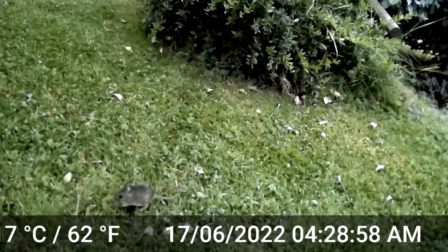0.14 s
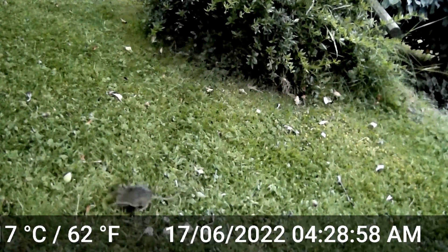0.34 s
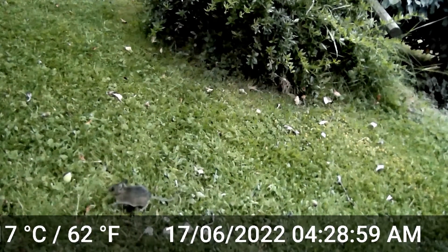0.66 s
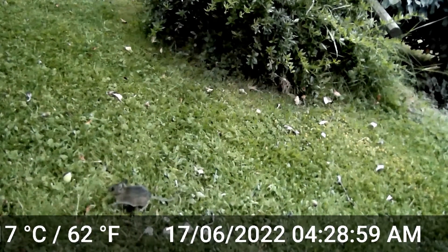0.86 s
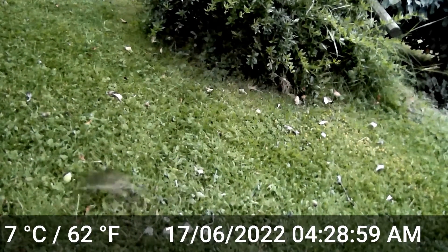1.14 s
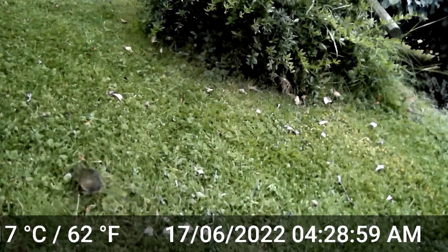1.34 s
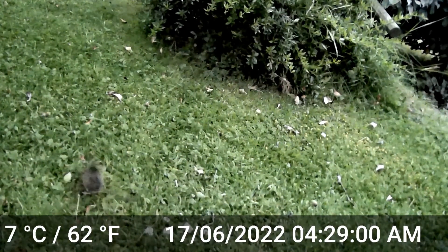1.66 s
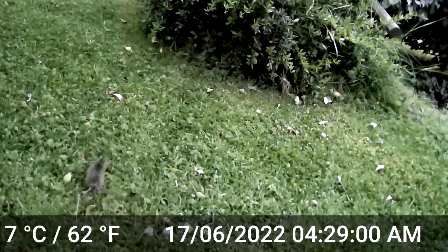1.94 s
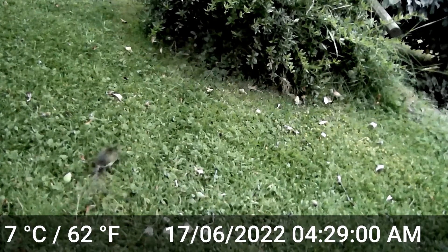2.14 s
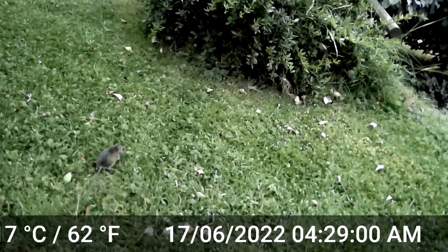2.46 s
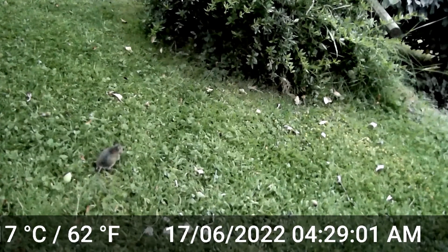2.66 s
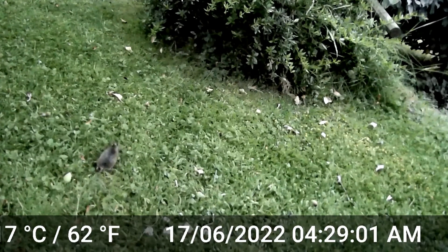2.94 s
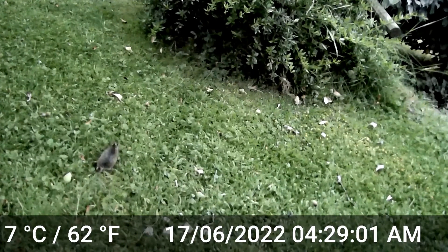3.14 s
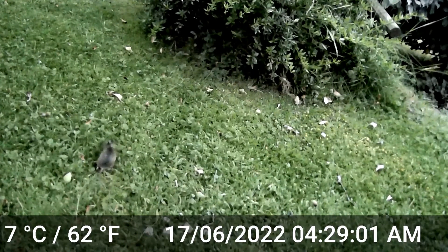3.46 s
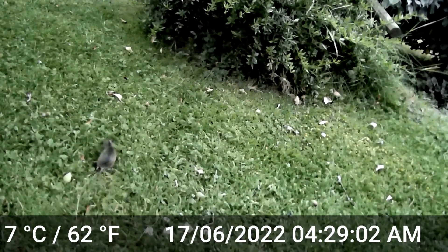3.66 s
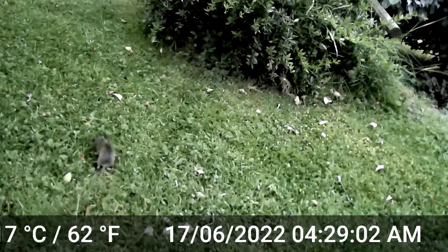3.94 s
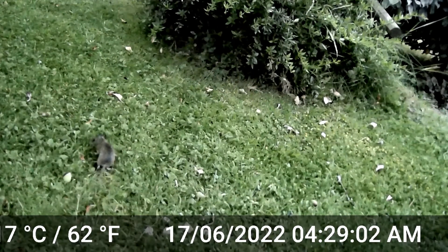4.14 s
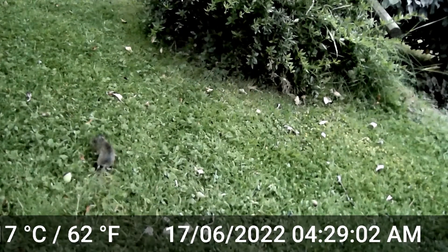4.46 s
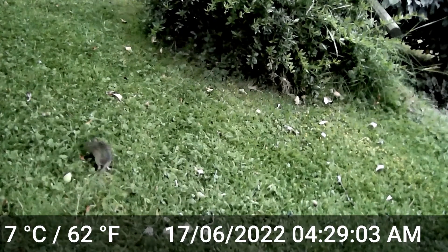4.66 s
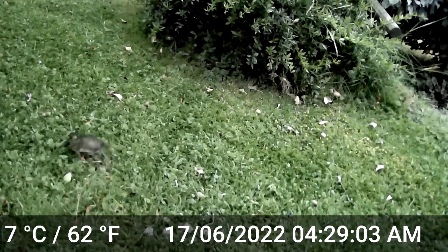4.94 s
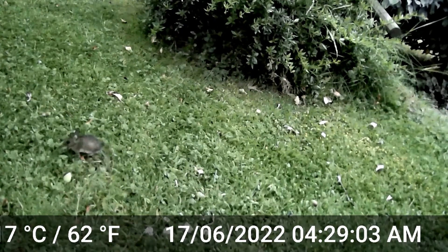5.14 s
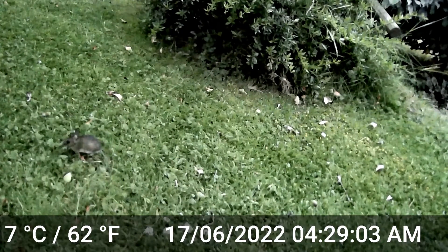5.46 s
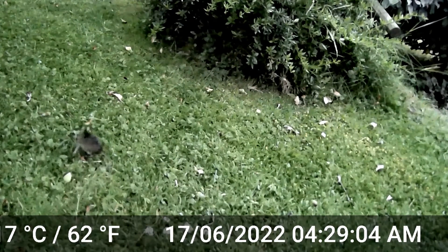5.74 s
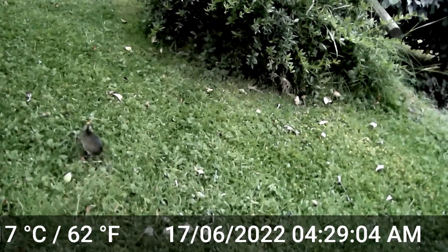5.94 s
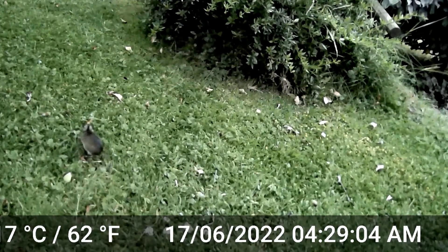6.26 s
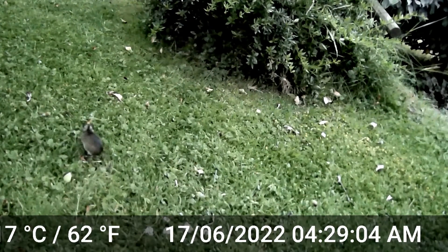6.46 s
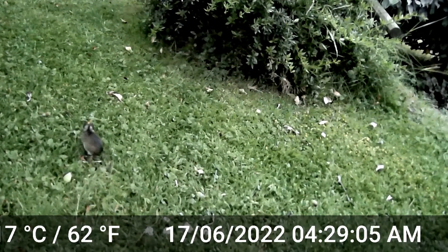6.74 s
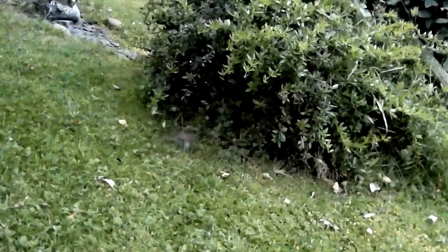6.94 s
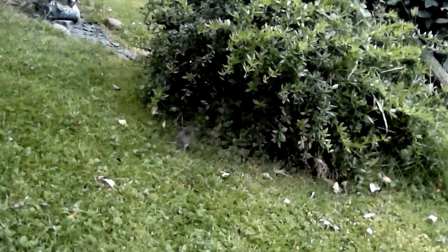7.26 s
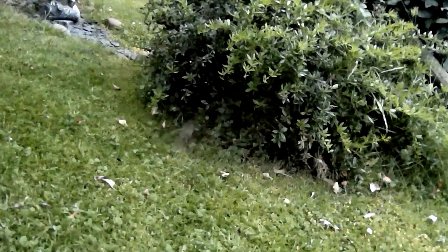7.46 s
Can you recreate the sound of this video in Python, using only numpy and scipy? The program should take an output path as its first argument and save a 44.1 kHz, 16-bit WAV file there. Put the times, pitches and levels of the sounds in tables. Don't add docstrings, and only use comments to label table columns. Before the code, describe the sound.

Outdoor dawn chorus over a lawn: a low flute-like singer, high pipers, birds repeating quick sweeps and faint distant warblers, all smeared by short echoes from fence, walls and leaves. The small camera microphone sounds band-limited and hissy, its treble briefly vanishing at times. Song is densest between two and four seconds, thins, then swells into loud whistles and trills before a dead cut with a click and barely audible rumble.

```python
import sys
import numpy as np
from scipy import signal
from scipy.io import wavfile

SR = 44100
rng = np.random.default_rng(int(sys.argv[2]) if len(sys.argv) > 2 else 0)


def persist_wave(psi):
    counts = np.round(np.clip(psi, -1, 1) * 32767).astype(np.int16)
    wavfile.write(sys.argv[1], SR, np.atleast_2d(counts).T)


def decibels_to_gain(level_db):
    exponent = np.asarray(level_db, float) / 20
    return 10 ** exponent


N = 335160

# (start [s], length [s], from [Hz], to [Hz], top level [dB])
FLUTE_NOTES = [(.13, 0.031, 1575, 1350, -59), (.175, 0.023, 1560, 1590, -59),
               (.215, .03, 1580, 1540, -66.5), (1.6, 0.034, 1400, 1510, -65.5),
               (1.625, 0.075, 1510, 1720, -55), (1.7, 0.073, 1556, 1730, -59),
               (1.75, 0.067, 1730, 1896, -58), (1.77, 0.068, 1637, 1493, -59.5),
               (1.875, 0.066, 1935, 1800, -50), (1.94, 0.098, 1860, 1795, -50),
               (1.845, 0.047, 1553, 1560, -59), (3.08, 0.069, 2273, 2270, -64.5),
               (2.96, 0.055, 1875, 1910, -63), (3.07, 0.069, 1896, 1850, -66),
               (3.335, 0.03, 1562, 1638, -52.5), (3.58, 0.064, 1813, 2030, -46.5),
               (3.65, 0.033, 2185, 2480, -55), (3.66, 0.054, 1734, 2120, -49.5),
               (3.716, 0.022, 3150, 2830, -49), (3.782, 0.031, 2390, 1875, -49.5),
               (3.87, 0.034, 2330, 1790, -59.5), (6.52, 0.044, 2310, 2320, -58)]
FAR_FLUTE_NOTES = [(.03, 0.085, 2090, 1950, -74), (.43, .17, 1697, 1660, -76), (.47, .17, 2286, 2330, -76),
                   (.72, .13, 2150, 2100, -74), (1.17, 0.052, 2250, 2370, -75),
                   (1.22, 0.08, 2350, 2274, -70), (1.31, .13, 2360, 2330, -72.5),
                   (1.47, 0.09, 2200, 2430, -71.5), (1.16, .1, 1560, 1520, -75),
                   (1.975, 0.048, 2543, 2400, -68), (2.31, 0.041, 3100, 3030, -69.5),
                   (3.44, 0.07, 2700, 2830, -66.5), (3.645, 0.026, 2960, 2950, -59),
                   (4.42, 0.055, 2213, 2220, -68.5), (4.59, 0.28, 2044, 2033, -72),
                   (4.77, 0.044, 2800, 2950, -68.5), (4.815, 0.044, 2380, 2630, -66.5),
                   (4.87, 0.098, 2460, 2520, -74), (5.04, 0.05, 2220, 2190, -68),
                   (5.27, 0.15, 2350, 2243, -74.5), (5.49, 0.096, 3150, 3260, -68.5),
                   (5.56, 0.062, 3250, 3630, -62.5), (5.62, 0.16, 3386, 2970, -63.5),
                   (5.63, .07, 1520, 1624, -65.5), (2.605, 0.023, 2990, 2810, -58.5),
                   (5.405, 0.026, 1760, 1745, -65), (2.21, .035, 2420, 2440, -71)]
PIPER_NOTES = [(.07, 0.021, 5080, 4880, -49.5), (.09, 0.049, 4780, 4590, -47.5),
               (.15, .05, 4680, 4720, -62), (.2, 0.075, 4850, 4670, -55.5), (.085, .025, 3050, 2880, -60),
               (.11, .1, 2870, 2860, -71), (.59, 0.034, 6450, 6780, -62), (.62, 0.13, 6730, 6800, -73.5),
               (1.315, 0.055, 7200, 7420, -70), (1.57, 0.032, 5700, 5270, -62),
               (1.597, 0.079, 5280, 4880, -52.5), (1.7, 0.13, 5330, 4980, -64.5),
               (2.16, .035, 7000, 5760, -68), (2.19, .03, 5700, 5650, -61.5), (2.2, .1, 5750, 5970, -66.5),
               (2.3, 0.067, 5720, 5700, -63.5), (3.745, 0.095, 6080, 6250, -67.5),
               (3.805, 0.059, 6300, 5980, -67.5), (3.86, 0.077, 6000, 6340, -70),
               (4.07, 0.038, 5060, 5060, -71), (4.11, 0.061, 5230, 5160, -66.5),
               (5.3, 0.064, 6950, 7050, -71), (5.345, 0.048, 7000, 5430, -64.5),
               (5.575, 0.026, 5320, 5150, -45.5), (5.61, 0.062, 5440, 5100, -59.5),
               (5.9, 0.018, 5400, 4370, -48.5), (5.93, 0.13, 4300, 4270, -61)]
HEDGE_NOTES = [(5.545, 0.031, 6120, 5320, -57), (5.68, 0.03, 5450, 5640, -51.5),
               (5.69, 0.022, 5580, 6050, -50), (5.9, 0.018, 5430, 4480, -53),
               (6.02, 0.049, 6250, 6670, -54.5), (6.055, 0.028, 6660, 6690, -47.5),
               (6.08, 0.09, 6640, 6730, -53), (6.13, 0.059, 6480, 6170, -55),
               (6.305, 0.032, 4690, 5160, -45.5), (6.335, 0.052, 4850, 4900, -53.5),
               (6.328, 0.021, 5050, 6150, -45.5), (6.58, 0.03, 6020, 5140, -46),
               (6.572, .018, 7000, 5900, -56), (6.6, .02, 5900, 7020, -57), (6.66, 0.095, 5170, 5160, -58),
               (6.607, 0.044, 5150, 5200, -43)]
WARBLER_PHRASES = [(1.7, 0.55, 4040, 3870, -82.5), (2.55, 0.21, 6020, 6020, -86),
                   (3.15, 0.23, 2267, 2420, -75), (4.08, 0.23, 7260, 7600, -91.5),
                   (4.78, 0.11, 3760, 3940, -74), (4.88, 0.61, 4050, 3790, -82),
                   (4.95, 0.49, 2450, 2415, -86.5), (5.45, 0.73, 2260, 2282, -82),
                   (5.65, .1, 6400, 6430, -78), (4.22, .18, 2495, 1850, -78),
                   (4.27, .14, 3650, 3300, -78.5), (5.25, .2, 2450, 2150, -79.5),
                   (4.8, .15, 2450, 2500, -83), (5.1, .2, 3900, 4130, -82)]

# (top at share of length [0-1], start below top [dB], end below top [dB])
FLUTE_SWELL = ((0.4, 6.7, 6.01))
FAR_FLUTE_SWELL = ((.5, 3.8, 5.4))
PIPER_SWELL = ((0.14, 5.4, 8.5))
HEDGE_SWELL = ((0.44, 8.2, 3.7))
WARBLER_SWELL = ((0.36, 2, 3.6))

# (time [s], pitch [Hz], level [dB])
HELD_LOW = [
    [(2.215, 1810, -61.5), (2.229, 1913, -48), (2.263, 1897, -47.5), (2.343, 2035, -45.5),
     (2.357, 1912, -45.5), (2.409, 2042, -55), (2.417, 2050, -65), (2.439, 2013, -45), (2.48, 1996, -73.5)],
    [(2.79, 2190, -61), (2.814, 2215, -51), (2.858, 2200, -51), (2.906, 2222, -46.5), (2.92, 2224, -51),
     (2.996, 2220, -55), (3.006, 2292, -49), (3.052, 2294, -46.5), (3.08, 2240, -66)],
    [(3.665, 2170, -60.5), (3.677, 2490, -50), (3.765, 2330, -51.5), (3.775, 2444, -55),
     (3.789, 2290, -48.5), (3.815, 2378, -48.5), (3.867, 2367, -57), (3.883, 2230, -49), (3.89, 2212, -62)],
    [(5.78, 1704, -65), (5.818, 1725, -55), (5.866, 1756, -69), (5.916, 1705, -48.5), (5.926, 1638, -62.5),
     (6.108, 1691, -51), (6.116, 1760, -66.5), (6.202, 1711, -54), (6.23, 1880, -76)],
]
HELD_HIGH = [(2.4, 2980, -71), (2.416, 2997, -52.5), (2.444, 3010, -48.5), (2.454, 3050, -57.5),
             (2.478, 2987, -47.5), (2.568, 2953, -46), (2.584, 3060, -47.5), (2.62, 2937, -52),
             (2.665, 3020, -82)]
HELD_PIPE = [(5.76, 4630, -75), (5.776, 4601, -65), (5.784, 4650, -73), (5.794, 4630, -56.5),
             (5.804, 4585, -58), (5.82, 4630, -39), (5.88, 4556, -73), (5.9, 4578, -65)]
HELD_CLIMB = [(6.612, 1318, -75), (6.622, 1397, -54.5), (6.662, 1619, -45), (6.682, 1679, -64),
              (6.692, 1695, -40.5), (6.708, 1788, -40.5), (6.72, 1887, -55.5), (6.725, 1863, -51)]

# (time [s], middle pitch [Hz], swing [Hz], level [dB])
TRILLS = [
    ((1.72, 67, 0.81), [(2.0, 1660, 220, -52), (2.08, 1780, 280, -55), (2.17, 1810, 200, -62.5)]),
    ((3.13, 70, 3.1), [(3.365, 1906, 59, -52.5), (3.42, 1785, 167, -49.5), (3.47, 1802, 192, -49.5), (3.565, 1686, 130, -60.5)]),
    ((6, 56, 2.2), [(6.285, 1500, 330, -67.5), (6.315, 1620, 390, -51), (6.375, 1740, 329, -51.5), (6.41, 1850, 198, -74)]),
    ((4.9, 135, 1.3), [(6.387, 7240, 248, -60.5), (6.43, 7470, 302, -59), (6.47, 7110, 250, -68.5)]),
    ((6.62, 46.2, 4.5), [(6.72, 1843, 44, -40), (6.75, 2104, 47, -41), (6.79, 2149, 17, -36.5), (6.84, 2128, 6.3, -26)]),
]

# shape (time after start [s], pitch [Hz], level [dB]), then repeats (start [s], level [dB])
FALL = ([(0, 5860, -14), (.008, 5600, -13.5), (.017, 5200, -7), (.026, 4720, 5.5), (.048, 4250, -5.5),
         (.068, 3760, 2.5), (.095, 3500, -27)], [(.242, -54.5), (.407, -55.5)])
SOFT_FALL = ([(0, 5800, 1), (.014, 5300, -5), (.028, 4700, 5), (.05, 4200, -1.5), (.09, 3420, -4)],
              [(.358, -67.5), (.53, -70), (.575, -78)])
RISE = ([(0, 3940, -8), (.008, 4120, 4), (.02, 4340, -1), (.033, 4760, 4), (.05, 5050, -3),
         (.078, 5900, -16)], [(.846, -57.5), (1.017, -56), (1.186, -55)])
SOFT_RISE = ([(0, 3988, -1), (.018, 4150, 0), (.04, 4670, -3), (.062, 5540, -3)], [(1.1, -65), (1.128, -69),
              (1.2, -64), (1.335, -71), (1.4, -69)])
TICK = ([(0, 4370, 0.14), (.02, 3700, -1.8)], [(1.73, -69.5), (1.8, -69), (1.87, -71), (2.02, -65.5),
         (2.08, -69.5), (2.205, -75)])
DROP = ([(0, 5390, -2), (.012, 4090, -3), (.033, 3300, -1), (.048, 3745, -1)], [(2.51, -61.5),
         (2.727, -64.5), (2.94, -68), (3.16, -66), (3.375, -67)])
HOOK = ([(0, 4410, -1.5), (.025, 3400, 0)], [(2.635, -69.5), (2.86, -68), (3.075, -73), (3.29, -70)])
LIFT = ([(0, 3410, -1), (.012, 3530, -2.5), (.02, 3620, -11), (.03, 3870, 4), (.04, 3620, 2),
         (.05, 3900, -7), (.062, 3490, -10)], [(3.467, -54.5), (3.556, -56.5), (3.646, -52.5), (3.668, -58),
         (3.765, -66.5), (3.905, -55.5), (3.992, -56), (4.095, -68)])
SLASH = ([(0, 5770, -17), (.022, 5170, -3), (.035, 4690, 3), (.043, 4200, -1.5), (.062, 3800, -12)],
          [(4.362, -59), (4.478, -66.5)])
PEEP = ([(0, 4050, 2), (.03, 3820, 0)], [(4.86, -63.5), (4.935, -60.5), (5.02, -61), (5.11, -72)])
HEDGE_DROP = ([(0, 4277, -0.5), (.012, 4070, 2), (.022, 3750, -2.5), (.04, 3145, -7.5)], [(6.205, -48),
               (6.47, -49.5), (6.7, -47)])

# (delay [s], level [dB])
LAWN_ECHOES = [(0.011, -5.5), (0.037, -9), (.09, -21)]
FENCE_ECHOES = [(.006, -3.0), (.017, -2.0), (.066, -18.0)]
HEDGE_ECHOES = [(0.014, -2), (0.031, -15), (.055, -2), (0.074, -5)]

# (frequency [Hz], density [dB/Hz])
AIR_COLOUR = [(12, -38), (20, -9), (54, -0.5), (89, 1), (296, -16), (400, -21), (1790, -30), (2080, -29.5),
              (3260, -34), (4080, -33.5), (7060, -37), (7800, -47), (10100, -77), (17200, -120)]
# (time [s], extra level [dB])
TRAFFIC_SWELL = [(0.0, -51), (0.261, -54.5), (1.119, -46.5), (1.44, -52), (3.24, -51), (3.37, -50),
                 (6.0, -53), (6.081, -46.5), (6.572, -53), (6.8, -49)]
# (start [s], length [s], from [Hz])
DROPOUTS = [(.665, 0.034, 7600), (.795, .035, 7650), (3.559, 0.037, 7500), (4.447, .028, 7700),
            (4.7, 0.09, 7650), (5.135, 0.047, 7400), (5.336, 0.034, 7650), (6.053, 0.081, 8440)]

AIR_DB = -50
CUT_S, RETURN_S, RETURN_DB = 6.8323, 7.15, -101.0


def glides(rows, swell):
    top_share, rise_db, fall_db = swell
    notes = []
    for start, length, from_hz, to_hz, level_db in rows:
        top_hz = from_hz + top_share * (to_hz - from_hz)
        notes.append([(start, from_hz, level_db - rise_db),
                      (start + top_share * length, top_hz, level_db),
                      (start + length, to_hz, level_db - fall_db)])
    return notes


def repeats(*syllables):
    notes = []
    for shape, starts in syllables:
        for start, level_db in starts:
            notes.append([(start + after, hz, level_db + rel_db) for after, hz, rel_db in shape])
    return notes


def rms_one(x):
    return x / np.sqrt(np.mean(x ** 2) + 1e-20)


def drift(rate):
    pole = np.exp(-40 * np.pi * rate / SR)
    noise = rng.standard_normal(N // 20 + 2002)
    slow = signal.lfilter([1], [1, -2 * pole, pole * pole], noise)[2000:]
    return np.interp(np.arange(N) / 20, np.arange(len(slow)), rms_one(slow))


def sing(notes, gain_db, edge_s, wobble, flutter_db):
    out = np.zeros(N)
    bend = 1 + wobble * drift(52)
    flutter = decibels_to_gain(flutter_db * drift(45))
    for note in notes:
        s, hz, level_db = np.transpose(note)
        i = np.arange(round(s[0] * SR), min(round(s[-1] * SR), N))
        t = i / SR
        ends = np.clip(np.minimum(t - s[0], s[-1] - t) / edge_s, 0, 1)
        phase = 2 * np.pi * np.cumsum(np.interp(t, s, hz) * bend[i]) / SR
        level = np.sqrt(2) * decibels_to_gain(np.interp(t, s, level_db) + gain_db)
        out[i] += level * ends * flutter[i] * np.sin(phase)
    return out


def garden(x, echoes, blur_s, scatter_db, t60):
    t = np.arange(SR // 2) / SR
    noise = rng.standard_normal((2, len(t)))
    scatter = noise[0] * decibels_to_gain(-60 * t / t60) * np.clip(t / 0.016, 0, 1)
    answer = decibels_to_gain(scatter_db) * scatter / np.sqrt(np.sum(scatter ** 2))
    for delay, level_db in echoes:
        blur = noise[1] * np.exp(-np.clip(t - delay, 0, 1) / blur_s) * (t >= delay)
        answer += decibels_to_gain(level_db) * blur / np.sqrt(np.sum(blur ** 2))
    answer[0] += 1
    return signal.fftconvolve(x, answer)[:N]


def fluting_singers():
    notes = glides(FLUTE_NOTES, FLUTE_SWELL) + glides(FAR_FLUTE_NOTES, FAR_FLUTE_SWELL)
    song = sing(notes, gain_db=-1.1, edge_s=0.0047, wobble=0.0024, flutter_db=4.16)
    return garden(song, LAWN_ECHOES, 0.0055, scatter_db=-12.0, t60=0.54)


def held_whistles():
    notes = HELD_LOW + [HELD_HIGH, HELD_PIPE, HELD_CLIMB]
    song = sing(notes, gain_db=-1.2, edge_s=.003, wobble=0.0033, flutter_db=2.8)
    return garden(song, [(.022, -7.5)], 0.005, scatter_db=-10.0, t60=.45)


def trill(beat, rows):
    top_s, per_s, throb_db = beat
    s, hz, swing_hz, level_db = np.transpose(rows)
    t = np.arange(N) / SR
    cycle = np.cos(2 * np.pi * per_s * (t - top_s) + .3 * drift(30))
    ends = np.clip(np.minimum(t - s[0], s[-1] - t) / 0.0061, 0, 1)
    pitch = np.interp(t, s, hz) + np.interp(t, s, swing_hz) * cycle
    phase = 2 * np.pi * np.cumsum(pitch) / SR
    return np.sqrt(2) * decibels_to_gain(np.interp(t, s, level_db) + throb_db * cycle) * ends * np.sin(phase)


def trilling_birds():
    song = sum(trill(beat, rows) for beat, rows in TRILLS)
    return garden(song, LAWN_ECHOES, .005, scatter_db=-4.5, t60=.25)


def high_pipers():
    notes = glides(PIPER_NOTES, PIPER_SWELL) + repeats(PEEP, LIFT)
    song = sing(notes, gain_db=-3.0, edge_s=.004, wobble=.007, flutter_db=4.0)
    return garden(song, LAWN_ECHOES, .005, scatter_db=-7.0, t60=.3)


def sweeping_birds():
    notes = repeats(FALL, SOFT_FALL, RISE, SOFT_RISE, TICK, DROP, HOOK, SLASH)
    song = sing(notes, gain_db=-2.0, edge_s=.003, wobble=.006, flutter_db=2.5)
    return garden(song, FENCE_ECHOES, .009, scatter_db=-6.5, t60=.35)


def hedge_singer():
    notes = glides(HEDGE_NOTES, HEDGE_SWELL) + repeats(HEDGE_DROP)
    song = sing(notes, gain_db=-5.5, edge_s=.004, wobble=.008, flutter_db=3.0)
    return garden(song, HEDGE_ECHOES, .008, scatter_db=2.5, t60=.33)


def distant_warblers():
    song = sing(glides(WARBLER_PHRASES, WARBLER_SWELL), gain_db=0, edge_s=.03, wobble=.025, flutter_db=5.0)
    return garden(song, [], .003, scatter_db=4.0, t60=.4)


def far_chorus(per_s, low_hz, high_hz, level_db):
    draws = rng.random((120, 5))
    starts = np.cumsum(-np.log(1 - draws[:, 0]) / per_s)
    pitches = low_hz * (high_hz / low_hz) ** draws[:, 1] ** 2
    notes = []
    for start, hz, draw in zip(starts, pitches, draws):
        if start < CUT_S:
            note_db = level_db - 6 * draw[2]
            end = start + 0.036 + 0.11 * draw[3]
            notes.append([(start, hz, note_db), (end, hz * (.9 + 0.26 * draw[4]), note_db)])
    song = sing(notes, gain_db=0, edge_s=.02, wobble=.01, flutter_db=3.0)
    return garden(song, [], .003, scatter_db=9.0, t60=.55)


def air(patchy_db, lumpy_db):
    out = 0
    edges = 18 * 2 ** np.arange(0, 9.0, 1 / 3)
    white = rng.standard_normal((2, N + SR))
    s, swell_db = np.transpose(TRAFFIC_SWELL)
    swell = np.interp(np.arange(N) / SR, s, swell_db - swell_db.mean()) + lumpy_db * drift(17)
    colour_hz, colour_db = np.transpose(AIR_COLOUR)
    for k, (low, high) in enumerate(zip(edges, edges[1:])):
        band_filter = signal.butter(2, [low, high], "band", fs=SR, output="sos")
        band = signal.sosfilt(band_filter, white[k % 2])[SR:]
        hz = np.sqrt(low * high)
        traffic_share = 1 / (1 + (hz / 220) ** 4)
        band_db = np.interp(np.log(min(hz, 6800)), np.log(colour_hz), colour_db)
        out = out + band * decibels_to_gain(band_db + traffic_share * swell + patchy_db * drift(7.9))
    return decibels_to_gain(AIR_DB) * rms_one(out)


def scene():
    near = fluting_singers() + held_whistles() + trilling_birds() + high_pipers() + sweeping_birds()
    behind = hedge_singer() + distant_warblers()
    far = far_chorus(per_s=14.0, low_hz=1900, high_hz=4200, level_db=-83.5)
    return (near + behind + far + air(patchy_db=1.1, lumpy_db=3.0))[None]


def band_limit(x):
    return signal.sosfilt(signal.butter(12, 16000, fs=SR, output="sos"), x)


def record(dry):
    camera_rate = 16000
    t = np.arange(N) / SR
    x = signal.sosfilt(signal.butter(10, 7650, fs=SR, output="sos"), dry)
    mirror = 2 * x * np.cos(2 * np.pi * camera_rate * t)
    image = signal.sosfilt(signal.butter(5, [8050, 8750], "band", fs=SR, output="sos"), mirror)
    x = signal.sosfilt(signal.cheby2(12, 40, 9150, fs=SR, output="sos"), x + decibels_to_gain(-9.0) * image)
    for start, length, from_hz in DROPOUTS:
        top = signal.sosfiltfilt(signal.butter(14, from_hz, "high", fs=SR, output="sos"), x)
        x = x - top * np.clip(np.minimum(t - start, start + length - t) / .008 + 1, 0, 1)
    hiss = signal.sosfilt(signal.cheby2(10, 40, 16000, fs=SR, output="sos"), rng.standard_normal(dry.shape))
    near = round(CUT_S * SR) + np.arange(-4, 8)
    cut = near[np.argmin(abs(abs(x[0, near]) - .022))] + 1
    fade_in = decibels_to_gain(RETURN_DB - AIR_DB) * np.clip((t - RETURN_S) / 0.1, 0, 2)
    x = (x + decibels_to_gain(-97.0) * hiss) * np.where(t < t[cut], 1, fade_in)
    return band_limit(x)


dry = scene()
out = record(dry)
persist_wave(out)
```